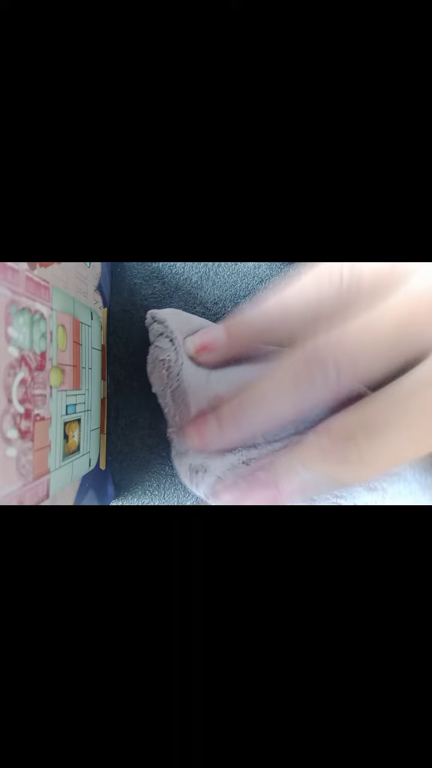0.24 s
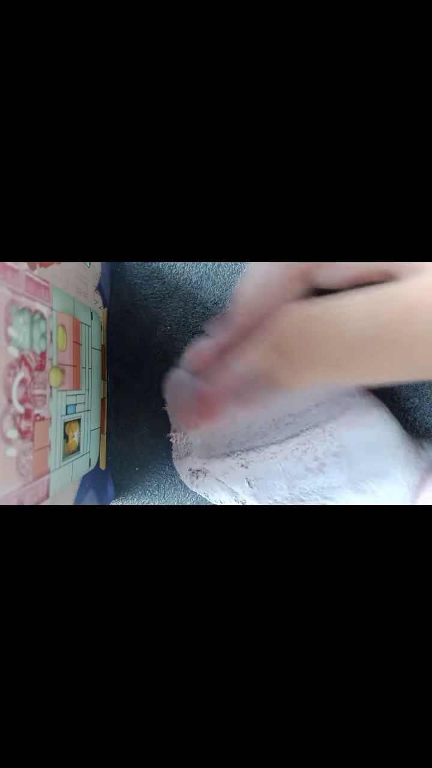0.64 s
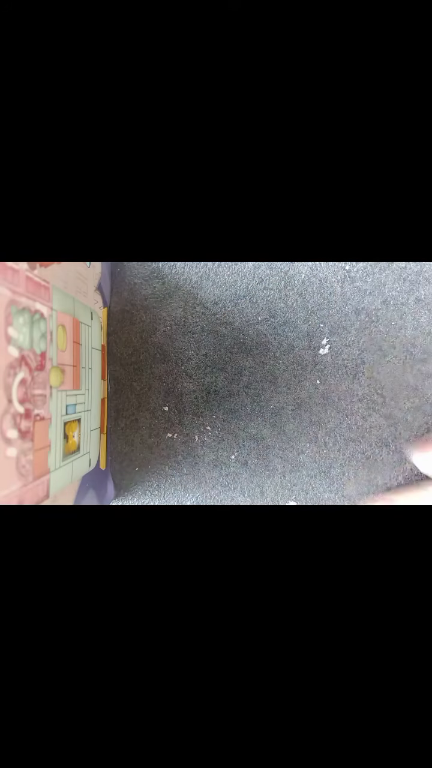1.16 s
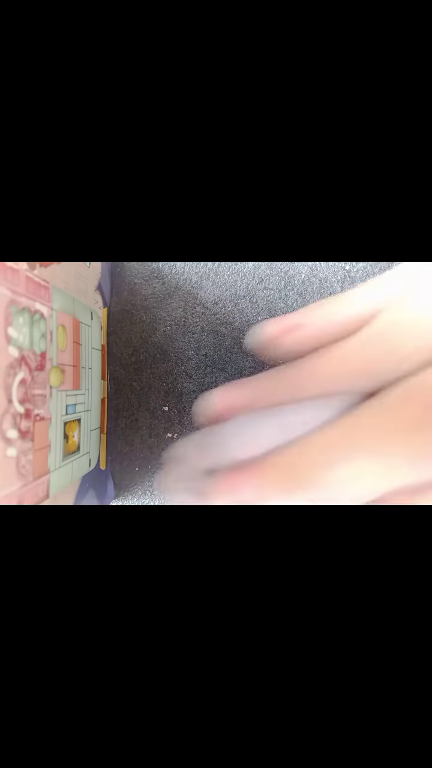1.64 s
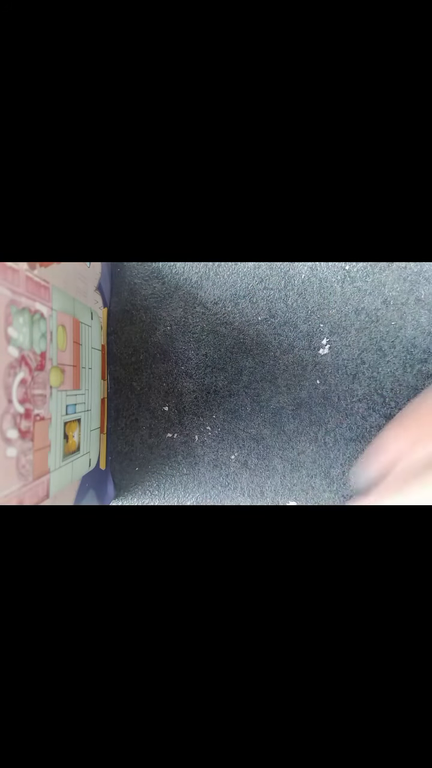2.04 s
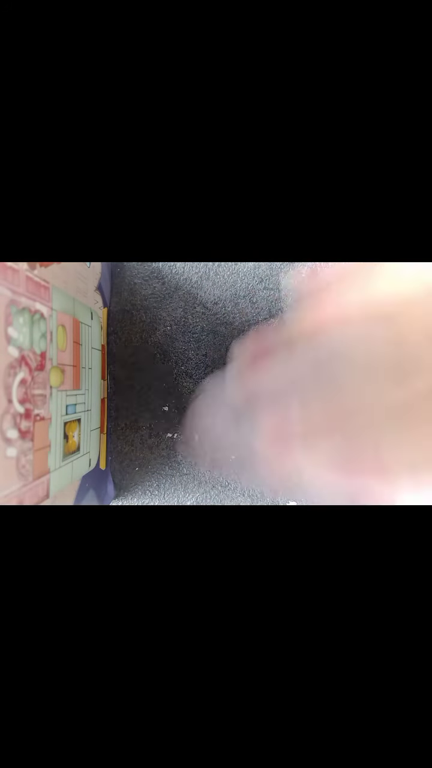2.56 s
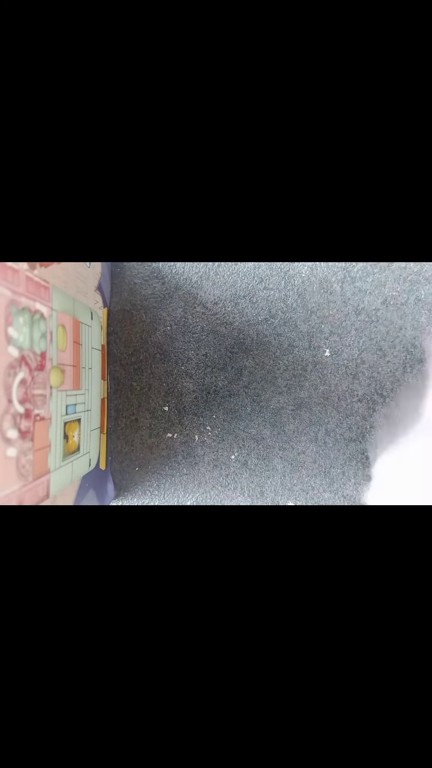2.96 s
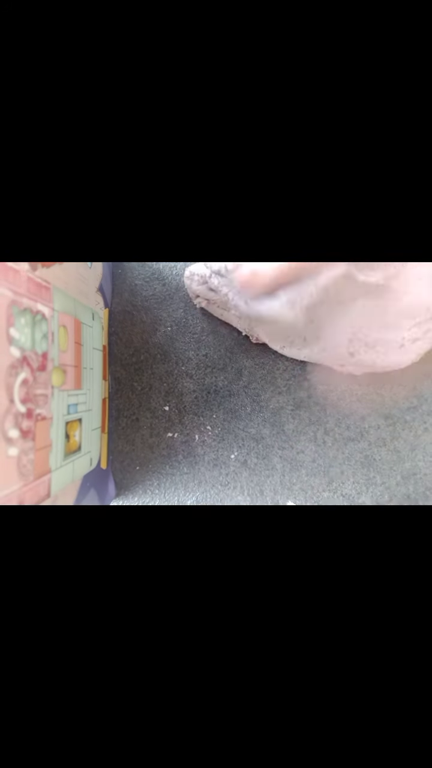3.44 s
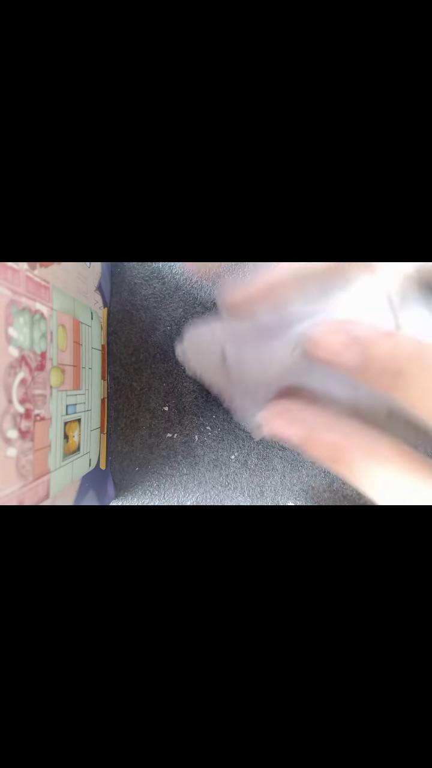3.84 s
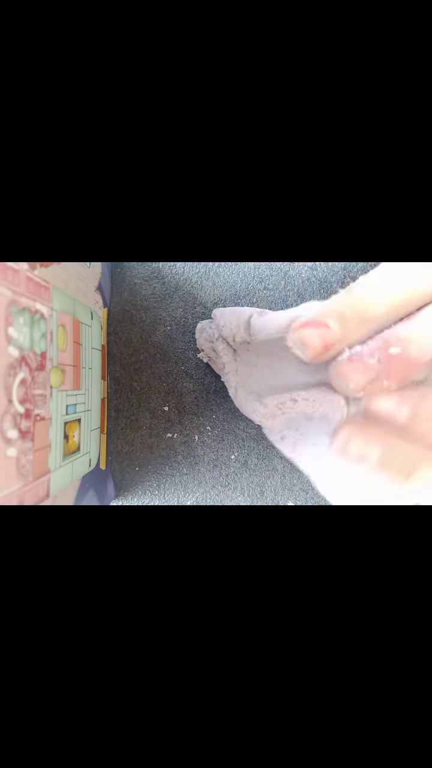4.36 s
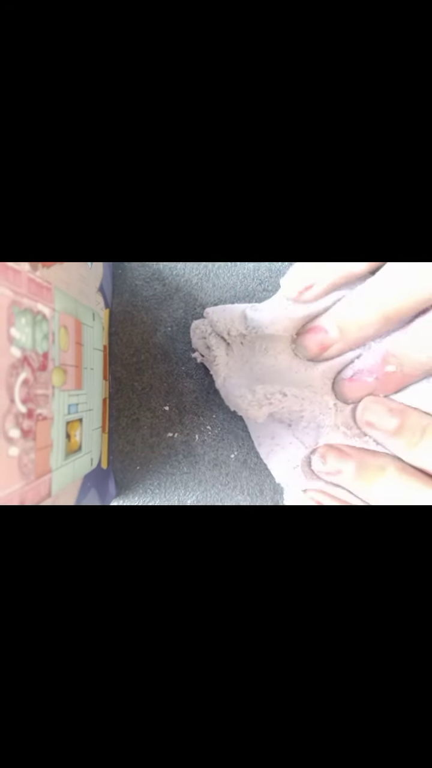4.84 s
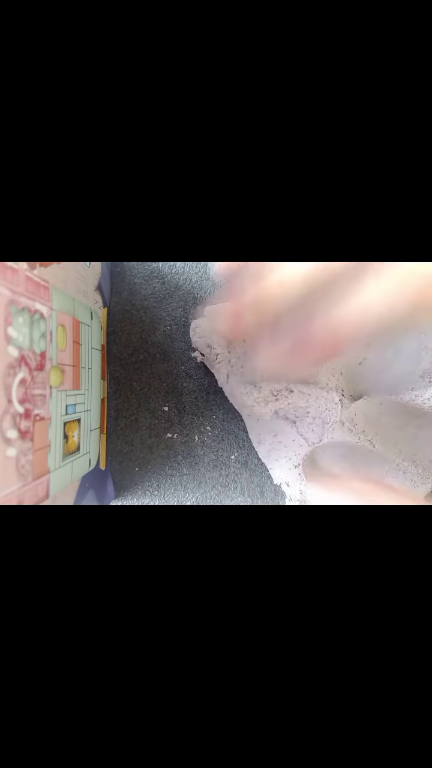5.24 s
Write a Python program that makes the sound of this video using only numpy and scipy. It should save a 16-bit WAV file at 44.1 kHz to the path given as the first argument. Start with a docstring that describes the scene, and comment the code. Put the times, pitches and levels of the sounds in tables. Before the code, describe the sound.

Very close to a small microphone in a small room, hands knead slime on a mat-covered table. A hollow pop and tiny bubble crackles come first, with faint skin rubbing; then eight quick pats, damped thuds with wet smacks stirring the table and a short room echo. Afterwards a palm sweeps over the slime, a pocket pops, and fingertips brush lightly.

```python
"""Kneading and patting slime

Hands work a lump of slime on a mat-covered table in a small room, close to a small microphone.
Eight quick pats, each a damped thud with a wet noise smack, stir table resonances and a diffuse room tail.
Air pockets pop as clicks with short rings, and fine bubbles crackle as random tiny rings under a squeeze.
Fingertips brush and a palm sweeps as fluttering, coloured noise, over a low rumble and faint room air."""
import sys
import numpy as np
from scipy import signal
from scipy.fft import rfft, irfft
from scipy.io import wavfile
from scipy.ndimage import uniform_filter1d

SR = 44100
rng = np.random.default_rng(int(sys.argv[2]) if len(sys.argv) > 2 else 0)


def dump(signal):
    """Clip the signal to [-1, 1] and save it as 16-bit WAV at the path in sys.argv[1]."""
    limited = np.clip(np.atleast_2d(signal).T, -1, 1)
    pcm = np.round(limited * 32767).astype(np.int16)
    wavfile.write(sys.argv[1], SR, pcm)


N = 242991
TIME = np.arange(N) / SR


def pats(palm_hz=450, palm_t60=0.02, air_t60=0.028,
         squelch_hz=1200, squelch_t60=0.0024, squelch_db=1.5, squelch_near_db=-8,
         table_db=-0.5, touch_lead_s=0.0018, body_room_db=-0.5, smack_room_db=-6, spray_db=-4):
    """Each pat is a thud that rings the table, a palm knock, hollow trapped air with a squelch, and a wet smack."""
    # one row per pat, levels relative: start_s, weight_db, palm_db, air_hz, air_db, smack_db, smack_length_s
    pat_hits = [(1.8293, -16, -16.5, 790, -20.5, -9.5, 0.0066),
                (2.0663, -17.5, -19.5, 794, -21, -9.5, 0.0094), (2.23, -19.5, -31, 684, -30, -8, 0.0055),
                (2.4166, -20.5, -25, 680, -27, -6.5, 0.0051),
                (2.6032, -20, -22.5, 709, -14.5, -13.5, 0.0062),
                (2.7717, -20.5, -40.5, 700, -20.5, -7, 0.0074), (2.9215, -29, -26, 643, -26, -10, .0091),
                (3.2806, -22.5, -16, 703, -15, -13, 0.0056)]
    # tone of the wet smack: frequency_hz, level_db
    smack_tone = [(200, -16.5), (700, 7.5), (1300, -6), (1900, 9), (2700, 0.5), (3900, 2), (5600, -1.5),
                  (7000, 3), (9000, -2), (15000, 0)]
    # table and room resonances under the thud: pitch_hz, level_db, t60_s
    table_modes = [(74, -34.5, 0.21), (91.8, -17, 0.5), (133, -11.5, 0.13), (152, -21.5, 0.37),
                   (182.1, -32.5, .2), (242.6, -14, 0.2), (269, -33, 0.3), (414, -21.5, 0.19)]
    # higher resonances stirred by the trapped air: pitch_hz, level_db, t60_s
    hollow_modes = [(565, -18, 0.11), (695, -20, 0.32), (791, -22, 0.31), (1220, -34.5, 0.15),
                    (1438, -45, 0.58)]
    # treble resonances stirred by the smack: pitch_hz, level_db, t60_s
    bright_modes = [(1850, -37, 0.08), (2140, -37.5, 0.051), (3990, -50, 0.16), (5340, -48.5, 0.11),
                    (5970, -61.5, 0.22)]
    out = np.zeros(N)
    to_walls = np.zeros(N)
    click = signal.unit_impulse(SR // 2)
    for s, weight_db, palm_db, air_hz, air_db, smack_db, length in pat_hits:
        palm = from_db(palm_db) * ring(palm_hz, palm_t60)
        trapped_air = from_db(air_db) * ring(air_hz, air_t60)
        body = from_db(weight_db) * thud() + palm - trapped_air
        squelch = from_db(air_db + squelch_db) * ring(squelch_hz, squelch_t60, np.cos)
        wet = from_db(smack_db) * colour(smack(length), smack_tone)

        ringing = from_db(weight_db + table_db) * modes(table_modes)
        ringing = ringing + from_db(air_db) * modes(hollow_modes)
        ringing = ringing + from_db(smack_db) * modes(bright_modes)
        add(out, s, body + ringing + from_db(squelch_near_db) * squelch)
        # the skin sticks just before the weight of the hand arrives
        add(out, s - touch_lead_s, wet)

        # the walls gather the smack from all directions, which evens out the spectrum of its echo
        spray = from_db(smack_db + spray_db) * colour(click, smack_tone)
        add(to_walls, s, from_db(body_room_db) * (body + squelch) + from_db(smack_room_db) * wet + spray)
    return out + room(to_walls)


def thud(hz=170, t60=0.016, lowest_hz=70):
    """The soft lump gives the table one short push."""
    return thin(ring(hz, t60), lowest_hz)


def smack(length_s, grain_db=6.5, echo_s=0.001073, echo_db=-4):
    """Sticky skin meets slime in a burst of tiny contacts, echoed by a surface nearby; scaled to energy 1."""
    t = TIME[:SR // 2]
    contacts = rng.standard_normal(len(t)) * from_db(grain_db * rng.standard_normal(len(t)))
    burst = contacts * t * np.exp(-3 * (t / length_s) ** 2)
    echo = np.interp(t - echo_s, t, burst)
    burst = burst + from_db(echo_db) * echo
    return burst / np.linalg.norm(burst)


def modes(table, vary_db=3.0, detune_octaves=0.025):
    """Each blow lands elsewhere and loads the table differently, so resonances vary in strength and pitch."""
    chance = rng.standard_normal((len(table), 2))
    total = 0
    for (hz, db, t60), (strength, shift) in zip(table, chance):
        pitch_hz = hz * 2 ** (detune_octaves * shift)
        total = total + from_db(db + vary_db * strength) * ring(pitch_hz, t60)
    return total


def pops(settle_hz=130, settle_t60=0.052, leak_ratio=0.37):
    """A thin wall snaps, the opened pocket rings briefly and the slime settles; thick walls snap duller."""
    # popping air pockets, levels relative; cycles = periods until the ring has lost 60 dB:
    # start_s, ring_db, pitch_hz, cycles, snap_db, brightness_hz, thud_db
    air_pockets = [(0.0756, -37.5, 2070, 9.1, -47, 3530, -51), (0.2078, -25, 507, 3.2, -8, 1710, -35.5),
                   (.655, -36, 1450, 11, -54, 3440, -41), (0.9945, -36.5, 1790, 7.6, -64, 3500, -54),
                   (1.015, -36.5, 1900, 5.3, -41, 4230, -52), (1.4822, -36.5, 2000, 17, -54, 6400, -75),
                   (1.7951, -45, 528, 1.8, -10, 700, -38.5), (2.831, -20, 1580, 8.3, -9.5, 8050, -53),
                   (2.9655, -22, 1610, 1.6, -16.5, 6640, -28), (3.554, -24.5, 866, 8.5, -12.5, 7000, -38),
                   (4.407, -35, 1560, 7, -21.5, 7840, -40.5), (4.4569, -20.5, 679, 7.9, -23.5, 6000, -48),
                   (5.0616, -41.5, 886, 19, -38, 6900, -66)]
    out = np.zeros(N)
    settle = ring(settle_hz, settle_t60)
    click = signal.unit_impulse(SR // 2)
    for s, ring_db, hz, cycles, snap_db, bright_hz, thud_db in air_pockets:
        # a small opening radiates little below the pitch of its pocket
        pocket = thin(ring(hz, cycles / hz, np.cos), leak_ratio * hz)
        burst = from_db(snap_db) * click + from_db(ring_db) * pocket
        add(out, s, soften(burst, bright_hz) - from_db(thud_db) * settle)
    return out


def crackle(per_s=260, spread_octaves=0.5, t60=0.0026, spread_db=3):
    """Under a squeeze small bubbles burst at random, each at the pitch of its size."""
    # squeezes; each bubble lands 6 to 12 dB above the base level: start_s, length_s, base_db, middle_pitch_hz
    squeezes = [(.078, 0.018, -53.5, 2120), (.21, 0.026, -47, 800), (0.576, 0.058, -57.5, 1820),
                (0.651, 0.021, -53, 1760), (.823, 0.022, -57.5, 1300), (0.954, 0.081, -55, 2020),
                (1.219, .047, -58.5, 690), (1.475, 0.1, -63, 1920), (3.544, 0.026, -47.5, 1220),
                (4.456, 0.022, -52.5, 834)]
    out = np.zeros(N)
    for start, length, db, hz in squeezes:
        for when, size, strength in rng.random((int(per_s * length), 3)):
            pitch_hz = hz * 2 ** (spread_octaves * (2 * size - 1))
            level_db = db + spread_db * (2 * strength + 2)
            add(out, start + when * length, from_db(level_db) * ring(pitch_hz, t60))
    return out


def friction(grain_db=-3.0, flutter_db=1.56, palm_db=-7, finger_db=-9):
    """Skin slides in dense tiny slips whose strength flutters with the grip."""
    # the palm rubs over the slime, level before palm_db: full_grip_s, level_db, rise_s, hold_s, fall_s
    palm_rubs = [(1.215, -66, 0.0074, 0.0036, 0.075), (4.034, -41.5, 0.013, 0.07, .225),
                 (5.172, -54.5, 0.0082, 0.0061, 0.035)]
    # fingertips brush over it, level before finger_db: peak_s, level_db, rise_s, fall_s
    finger_brushes = [(.03, -66.5, .15, 0.47), (.372, -55.5, 0.029, 0.15), (.84, -61.5, 0.053, 0.18),
                      (1.485, -55, 0.16, 0.056), (1.58, -56, .05, 0.038), (3.92, -66.5, 0.41, 0.3),
                      (5.18, -54, 0.041, 0.069), (5.46, -55.5, 0.07, 0.091)]
    # tone of the palm: frequency_hz, level_db
    palm_tone = [(300, -31), (1400, -15.5), (2100, -2), (3200, 2.5), (5000, -2), (6500, 5), (9000, -17),
                 (15000, -28)]
    # a light fingertip makes only a thin hiss: frequency_hz, level_db
    finger_tone = [(300, -44), (2000, 2), (5000, -5.5), (6200, 6), (9000, -8), (15000, 0)]
    slips = rng.standard_normal(N) * from_db(grain_db * rng.standard_normal(N))
    # noise averaged over 200 samples (4.5 ms) moves the grip
    flutter = rms_one(uniform_filter1d(rng.standard_normal(N), size=200))
    sliding = slips * from_db(flutter_db * flutter)
    rubs = sum(gesture(s, db, rise, fall, hold) for s, db, rise, hold, fall in palm_rubs)
    brushes = sum(gesture(s, db, rise, fall) for s, db, rise, fall in finger_brushes)
    palm = from_db(palm_db) * rubs * rms_one(colour(sliding, palm_tone))
    fingers = from_db(finger_db) * brushes * rms_one(colour(sliding, finger_tone))
    return palm + fingers


def kneading(resting_db=-66, level_db=3):
    """The hands keep up a faint low rumble in the table, which swells with each press."""
    # the hand presses the lump onto the table, level before level_db: peak_s, level_db, rise_and_fall_s
    hand_presses = [(.65, -60, 0.079), (1.265, -51, 0.099), (1.425, -50.5, 0.043), (1.57, -56, 0.056),
                    (4.23, -54.5, 0.071), (4.95, -58, 0.12), (5.2, -50.5, 0.052)]
    # tone of the rumble: frequency_hz, level_db
    rumble_tone = [(30, -8), (90, 4.5), (170, 0), (300, -17), (700, -29), (3000, -51)]
    presses = sum(gesture(s, db, swell, swell) for s, db, swell in hand_presses)
    # resting_db, like the presses, is a level before level_db
    effort = np.hypot(from_db(resting_db), presses)
    rumble = rms_one(colour(rng.standard_normal(N), rumble_tone))
    return from_db(level_db) * effort * rumble


def gesture(s, db, rise, fall, hold=0, fade_db=20):
    """Gain over time of one hand movement: swells by fade_db per rise time until s, holds, then dies away."""
    before = np.maximum((s - TIME) / rise, 0)
    after = np.maximum((TIME - s - hold) / fall, 0)
    return from_db(db - fade_db * np.minimum(before + after, 10))


def room(x, first_echo_s=0.0036, t60=0.27, lowest_hz=115):
    """Dense reflections start after a few milliseconds and die away evenly; the deep bass is thinned out."""
    # tone of the reflections: frequency_hz, level_db
    room_tone = [(60, -36), (200, 3.5), (450, -5), (750, -6.5), (1200, 1.5), (2000, -4), (4000, -2),
                 (6500, 1.5), (15000, -10)]
    t = TIME[:SR // 2]
    decay = np.exp(-np.log(1000) * t / t60)
    tail = rng.standard_normal(len(t)) * decay * (t > first_echo_s)
    tail = thin(tail / np.linalg.norm(tail), lowest_hz)
    return colour(convolve(x, tail), room_tone)


def room_air(level_db=-66):
    """Steady noise of the air in the room, strongest in the bass."""
    # tone of the air, which also sets its loudness: frequency_hz, level_db
    air_tone = [(25, 26), (90, 16.5), (170, 18.5), (270, 21.5), (380, 7.5), (900, 2), (1600, 5.5),
                (2400, -1), (5000, -10.5), (9000, -13.5), (15000, -4)]
    return from_db(level_db) * colour(rng.standard_normal(N), air_tone)


def suppress_rumble(x, below_hz=420, open_db=-47, range_db=7, depth_db=7):
    """A noise suppressor turns the bass down whenever the bass is weak."""
    bass = signal.sosfiltfilt(signal.butter(2, below_hz, fs=SR, output="sos"), x)
    # power averaged over 900 samples (20 ms)
    power = np.abs(uniform_filter1d(bass ** 2, size=900))
    bass_db = 10 * np.log10(power + 1e-14)
    shut = np.clip((open_db - bass_db) / range_db, 0, 1)
    return x + bass * (from_db(-depth_db * shut) - 1)


def from_db(db):
    """Decibels to gain."""
    return 10 ** (np.asarray(db) / 20)


def rms_one(x):
    """Scale to an rms of 1."""
    return x / np.sqrt(np.mean(x ** 2) + 1e-20)


def convolve(x, response):
    """Pass x through an impulse response, keeping its length."""
    return signal.fftconvolve(x, response)[:len(x)]


def colour(x, spectrum, size=8192):
    """Causal (minimum-phase) filter that follows (frequency_hz, level_db) points."""
    hz, db = np.transpose(spectrum)
    grid = np.maximum(np.fft.rfftfreq(size, 1 / SR), 1)
    gain = from_db(np.interp(np.log(grid), np.log(hz), db))
    # folding the cepstrum onto positive times makes the filter minimum-phase
    cepstrum = irfft(np.log(gain))
    cepstrum[1:size // 2] *= 2
    cepstrum[size // 2 + 1:] = 0
    return convolve(x, irfft(np.exp(rfft(cepstrum))))


def ring(hz, t60, wave=np.sin):
    """A damped oscillation, half a second long, whose envelope starts at 1 and falls 60 dB in t60 seconds."""
    t = TIME[:SR // 2]
    return wave(2 * np.pi * hz * t) * np.exp(-np.log(1000) * t / t60)


def soften(x, hz):
    """Two-pole low-pass."""
    return signal.sosfilt(signal.butter(2, min(hz, 0.45 * SR), fs=SR, output="sos"), x + 1e-18)


def thin(x, hz):
    """Two-pole high-pass."""
    return signal.sosfilt(signal.butter(2, hz, "high", fs=SR, output="sos"), x + 1e-18)


def add(track, s, sound):
    """Mix a sound into the track at time s, in seconds."""
    start = round(s * SR)
    track[start:start + len(sound)] += sound[:N - start]


def scene(near_room_db=-14):
    """The pats fill the room; the small sounds next to the microphone stay nearly dry."""
    near = pops() + crackle() + friction() + kneading()
    return (pats() + near + from_db(near_room_db) * room(near) + room_air())[None]


def record(dry, cutoff_hz=16200):
    """The microphone port rings near 6 and 15 kHz; weak bass is suppressed and the top is cut."""
    # response of the microphone: frequency_hz, level_db
    microphone = [(25, -32), (50, -8), (85, -1), (3000, -1), (4500, 2), (5500, 7), (6350, 14), (7100, -2.5),
                  (8000, -8.5), (10000, -12), (13500, -18.5), (15200, -2.5), (16000, -15.5)]
    heard = suppress_rumble(colour(dry[0], microphone))
    top_cut = signal.ellip(10, 0.1, 80, cutoff_hz, fs=SR, output="sos")
    return signal.sosfilt(top_cut, heard)[None]


dry = scene()
out = record(dry)
dump(out)
```